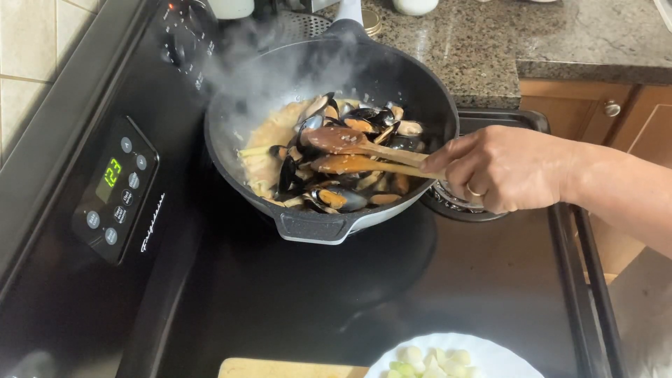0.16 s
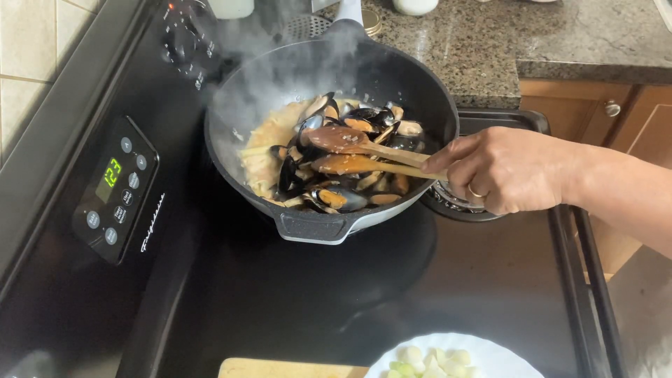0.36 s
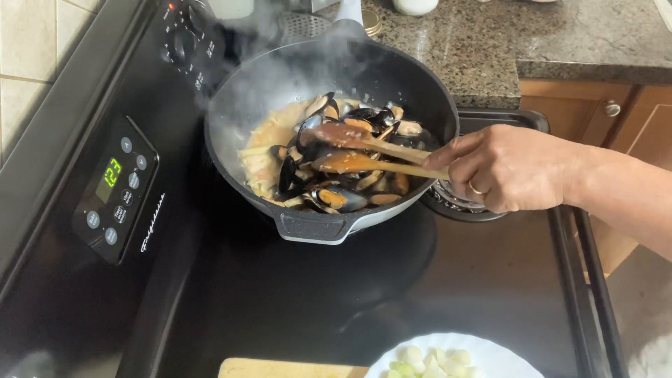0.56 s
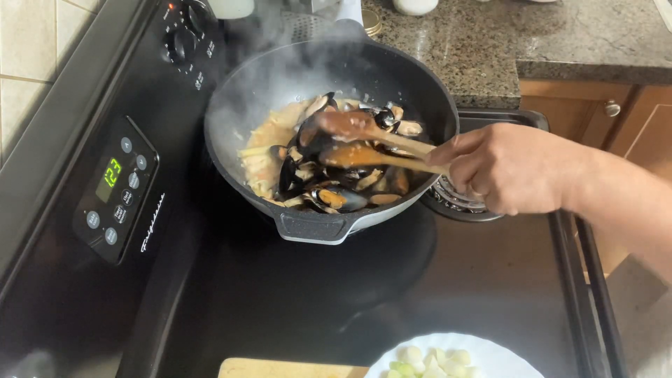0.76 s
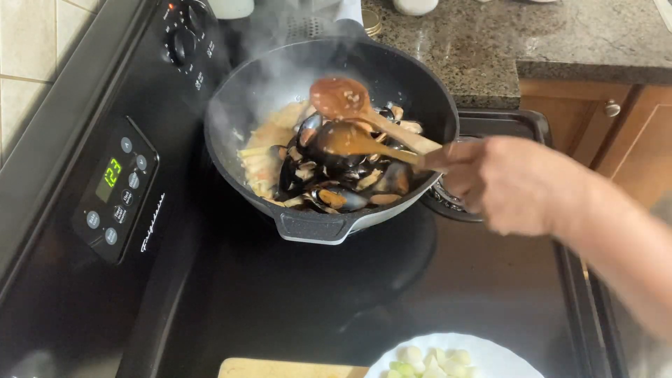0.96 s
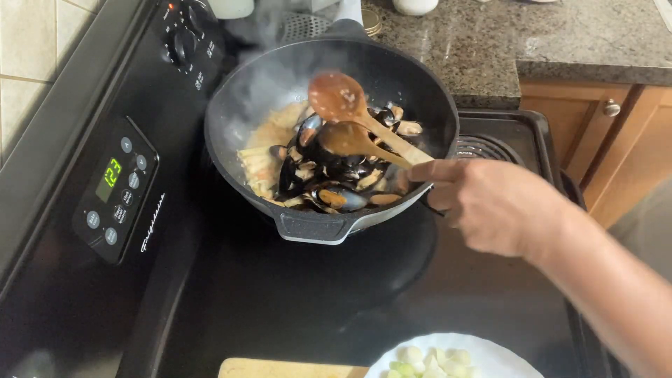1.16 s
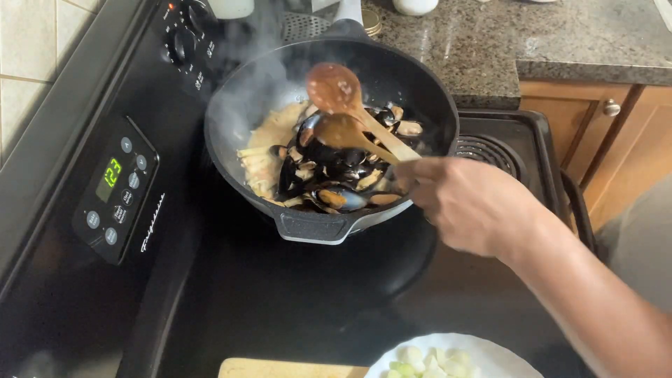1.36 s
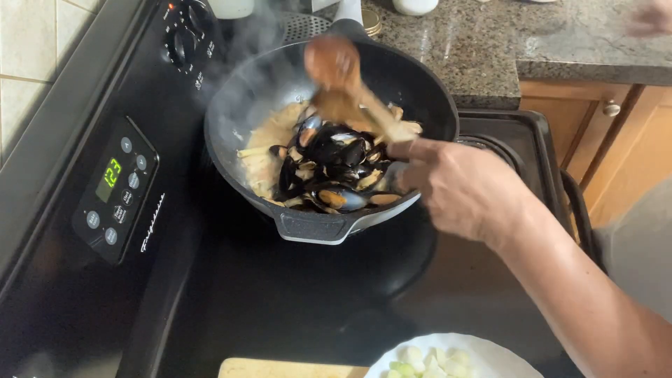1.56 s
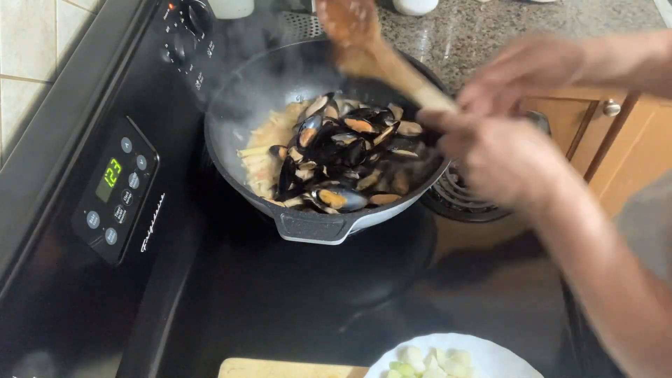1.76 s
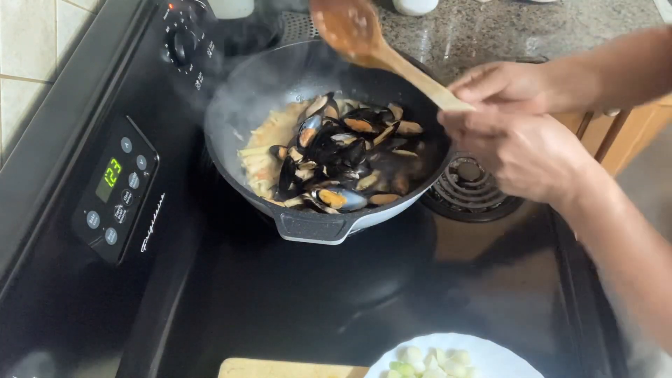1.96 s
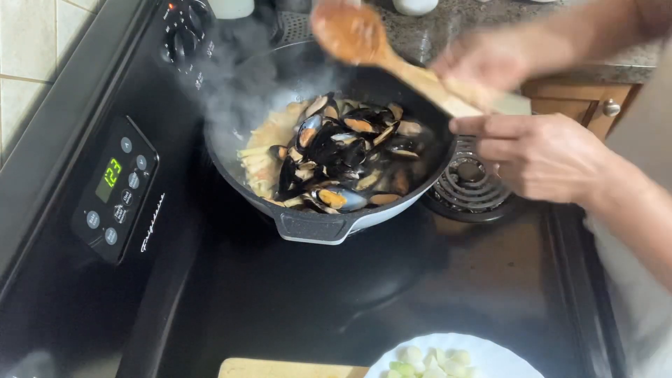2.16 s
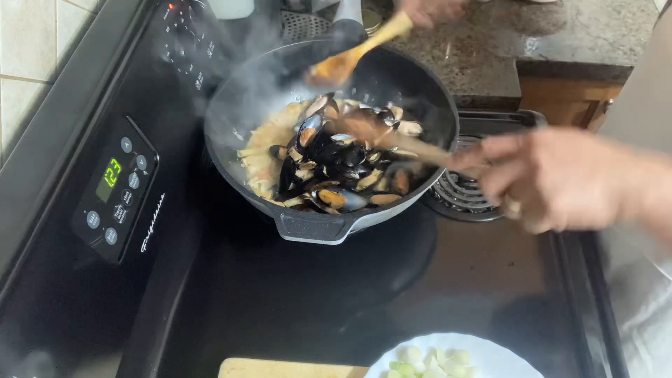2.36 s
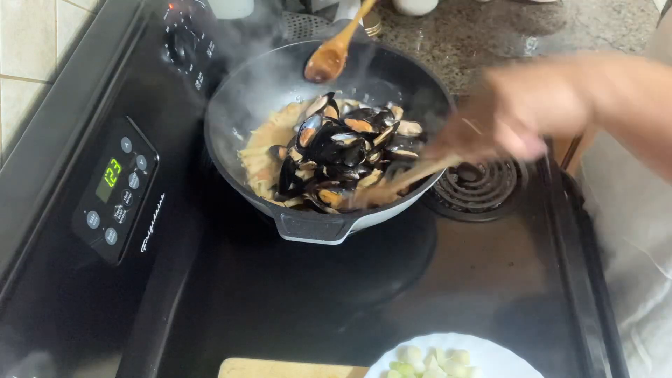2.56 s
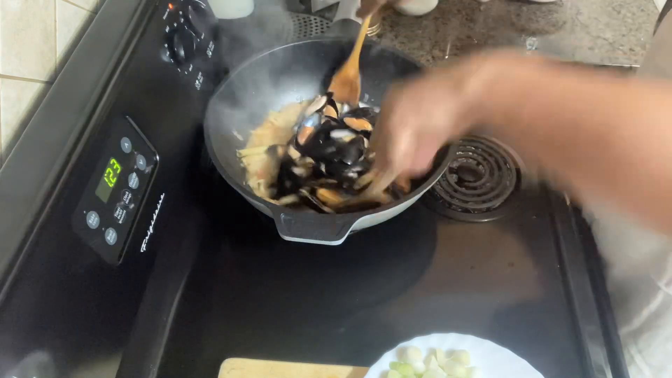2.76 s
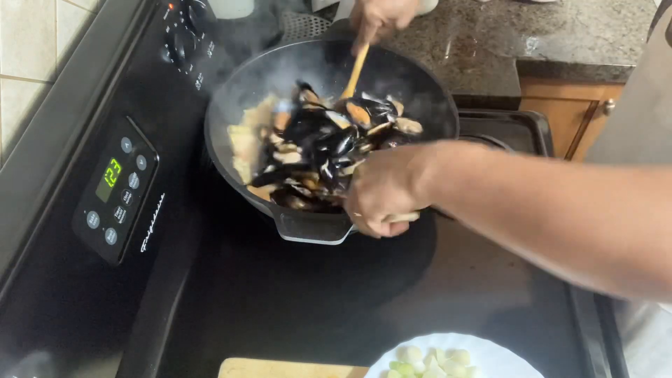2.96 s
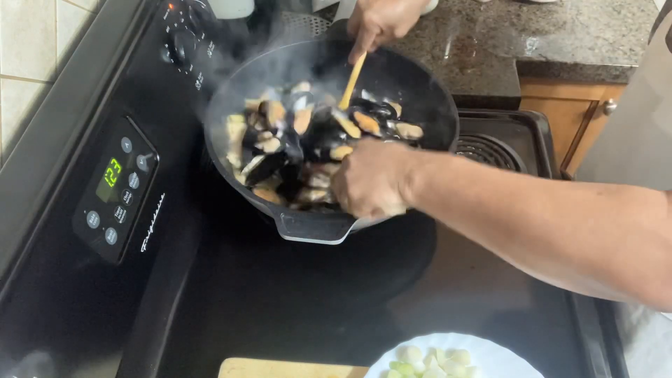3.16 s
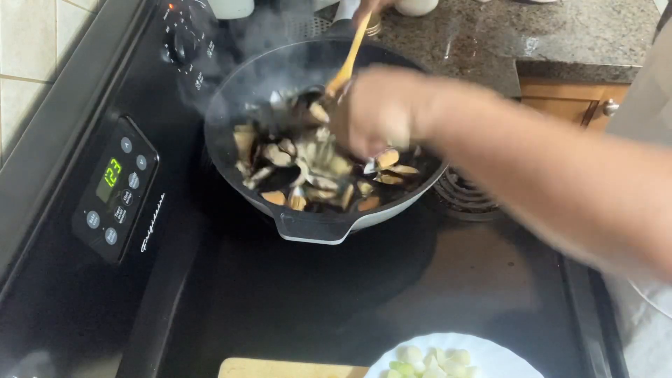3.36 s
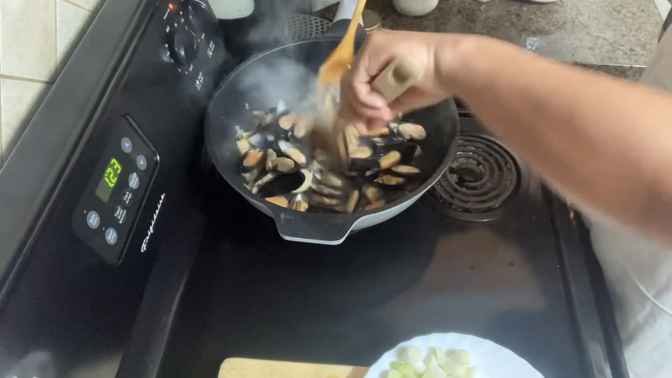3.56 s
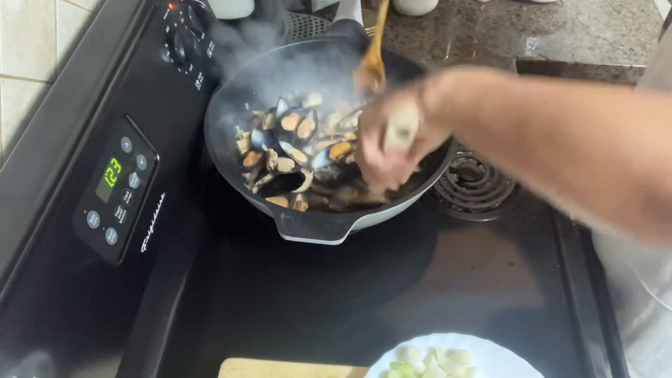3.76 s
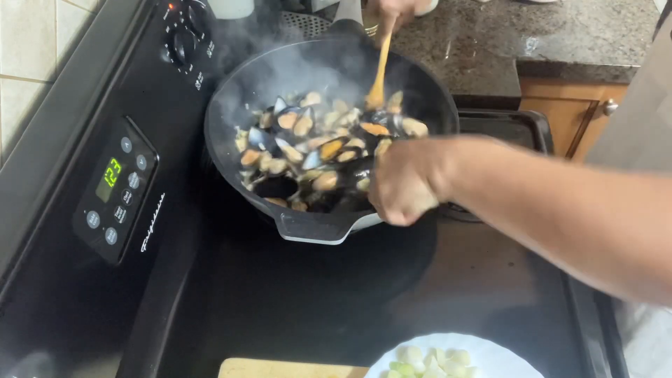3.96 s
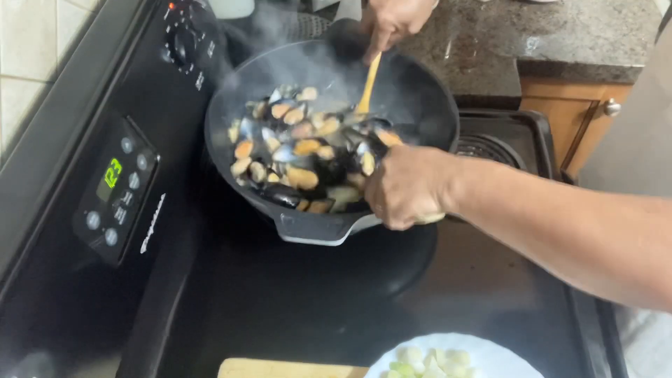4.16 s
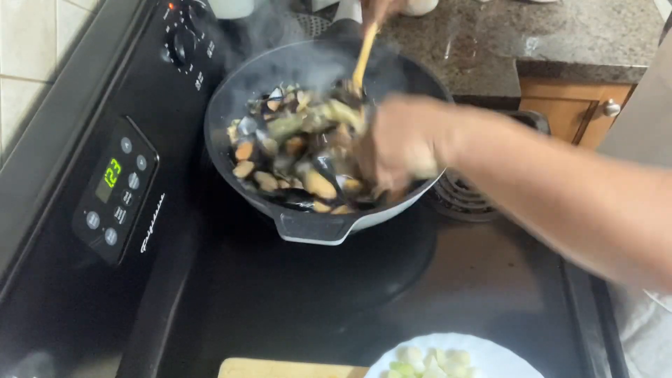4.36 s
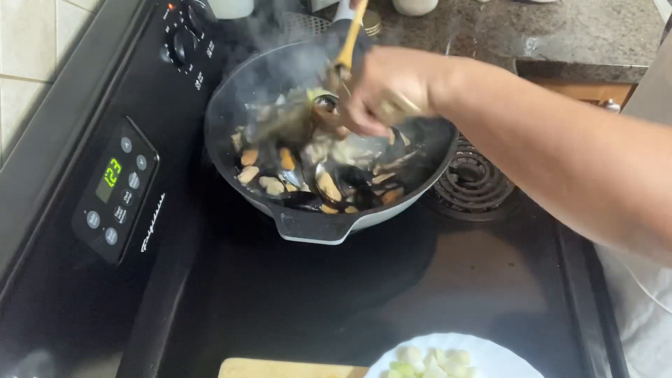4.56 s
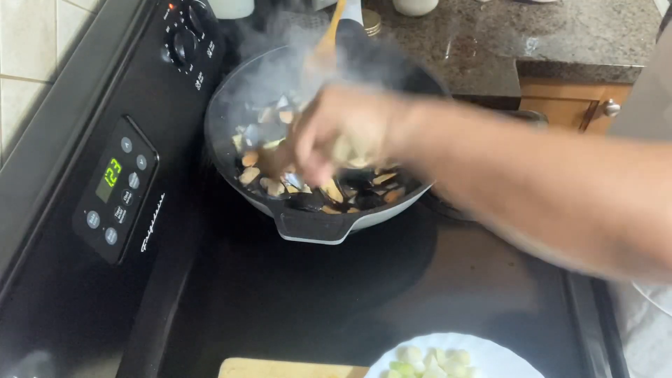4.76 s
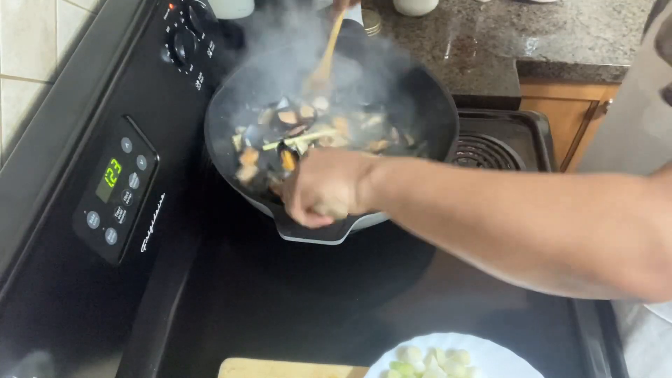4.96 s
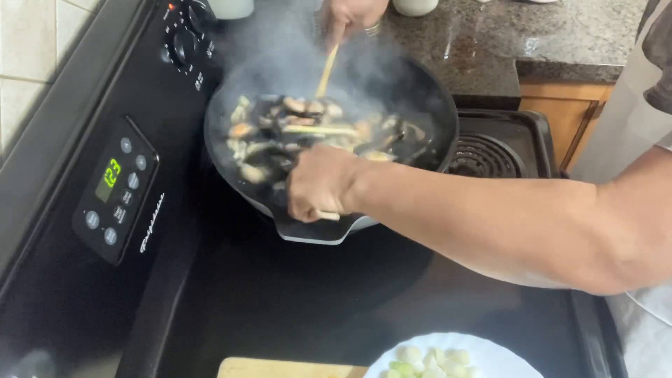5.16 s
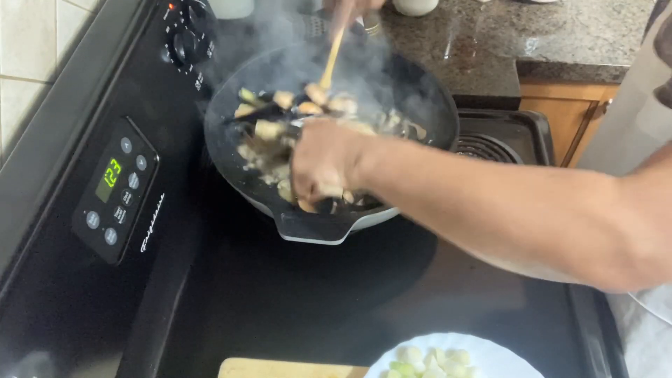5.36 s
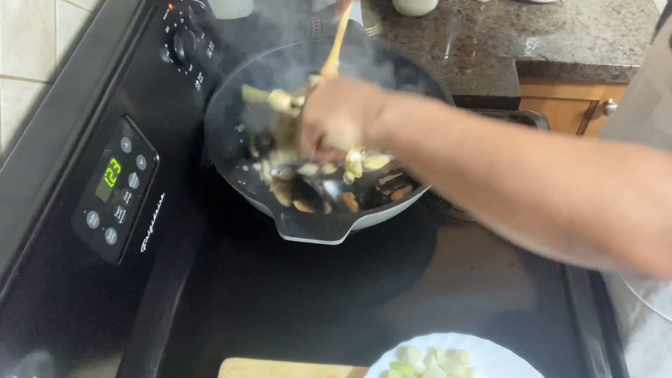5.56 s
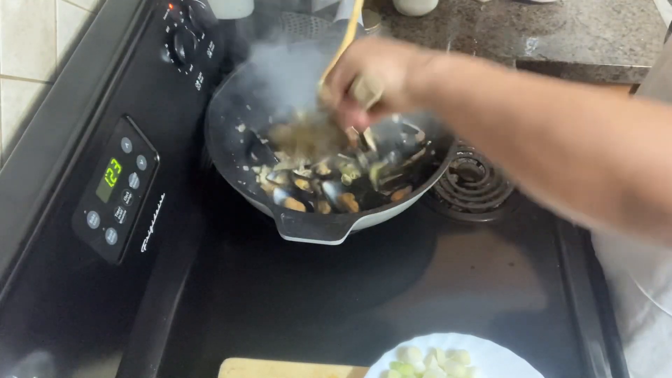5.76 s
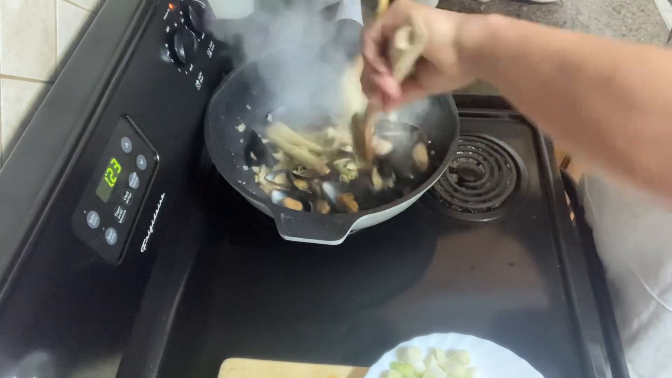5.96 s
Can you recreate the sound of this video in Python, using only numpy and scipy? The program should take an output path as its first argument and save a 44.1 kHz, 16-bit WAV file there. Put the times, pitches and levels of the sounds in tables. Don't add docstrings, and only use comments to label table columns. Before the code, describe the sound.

Close stereo pickup at a stove: steady airy steam and bubbling throughout. First, off to the side, a wooden cupboard door clicks, creaks briefly upward and slams. A calm stretch follows with faint shell ticks and bubble pops. Then spoons land on a ringing coated pan and turn a heap of hard shells three times, in dense irregular clatter with scraping, low pan shoves and sharp high snaps, loudest in the later two tosses.

```python
import sys
import numpy as np
from scipy import signal
from scipy.fft import rfft, irfft, next_fast_len
from scipy.io import wavfile
from scipy.ndimage import uniform_filter1d

SR = 44100
rng = np.random.default_rng(int(sys.argv[2]) if len(sys.argv) > 2 else 0)


def generate_wav(signal):
    frames = np.transpose(np.atleast_2d(signal))
    scaled = np.clip(frames, -1, 1) * 32767
    pcm = np.round(scaled).astype(np.int16)
    wavfile.write(sys.argv[1], SR, pcm)


def gain_from_decibels(decibels):
    exponent = np.asarray(decibels, float) / 20
    return 10 ** exponent


N = 265614

# start_s, snap of the lips snap_db, strongest ring ring_hz, body knock_db
FIRST_TOSS = [(2.55, -55, 854, -20), (2.652, -31, 4350, -29.5), (2.6796, -27, 2530, -38),
              (2.7546, -30, 2880, -31.5), (2.788, -46, 1100, -37), (2.8859, -26, 1190, -37),
              (2.921, -49, 1600, -34), (2.9568, -64, 1970, -31), (2.9987, -39, 1130, -34),
              (3.018, -31, 3050, -33), (3.041, -25.5, 1460, -28), (3.0953, -55, 1570, -32.5),
              (3.137, -18.5, 990, -26), (3.1795, -60, 1490, -35), (3.2058, -49, 1680, -37),
              (3.238, -55, 2070, -36), (3.2628, -30, 1940, -34.5), (3.308, -22.5, 4870, -34),
              (3.3658, -34, 3600, -43), (3.417, -33, 1576, -29), (3.4367, -47, 2290, -36),
              (3.456, -29, 3670, -49), (3.497, -28, 8650, -33), (3.5453, -26, 3010, -24),
              (3.5513, -12, 4100, -22.5), (3.5792, -32, 4040, -34), (3.5953, -21.5, 4450, -35)]
SECOND_TOSS = [(3.6554, -22, 3240, -19.5), (3.6629, -26, 1238, -19), (3.6788, -29, 2500, -16.5),
               (3.689, -50, 895, -28), (3.7215, -47, 2560, -24.5), (3.7269, -16, 950, -30),
               (3.815, -32, 1670, -30.5), (3.847, -39, 2400, -29), (3.8678, -51, 2260, -29),
               (3.9315, -32, 1690, -26), (3.957, -64, 1590, -31), (4.0712, -18, 7750, -26.5),
               (4.089, -61, 2700, -48), (4.198, -48, 1800, -32.5), (4.2437, -14, 1190, -31),
               (4.253, -4.5, 4770, -21.5), (4.2608, -26, 4930, -55), (4.3311, -21, 2700, -32),
               (4.3736, -22.5, 1360, -33), (4.3979, -17, 4870, -21.5), (4.4482, -2, 8720, -41),
               (4.4994, -28, 4930, -44), (4.5617, -41, 1990, -39), (4.619, -24, 3200, -37.5),
               (4.6585, -5.5, 8050, -23.5), (4.7274, -25.5, 2970, -29)]
THIRD_TOSS = [(4.787, -36.5, 2610, -19.5), (4.7988, -62, 850, -23.5), (4.8746, -27.5, 1825, -28.5),
              (4.8992, -30, 810, -32.5), (4.9346, -37, 1802, -21), (5.019, -22.5, 1180, -33),
              (5.0671, -32, 1970, -38), (5.1287, -32.5, 1450, -62), (5.187, -32, 1490, -51),
              (5.218, -8.5, 7740, -28), (5.298, -10, 7600, -31), (5.3145, -12.5, 8500, -28),
              (5.3584, -9, 4540, -25.5), (5.366, -39, 4500, -27), (5.4139, -25, 1600, -31),
              (5.4224, -5.5, 8450, -27.5), (5.4252, -33, 8000, -45), (5.5117, -22.5, 1700, -36),
              (5.547, -8.5, 4820, -28), (5.6836, -40, 1650, -36), (5.7091, -37, 3730, -36.5),
              (5.8037, -21.5, 8350, -41.5), (5.8987, -31.5, 1330, -35.5), (5.996, -28.5, 4600, -38.5)]
# start_s, level_db
STROKES = [
    (2.53, -44),
    (3.658, -41.5),
    (4.776, -42.5),
]


def at_hz(points, hz):
    point_hz, value = np.transpose(points)
    return np.interp(np.log(hz + 1), np.log(point_hz + 1), value)


def rms_one(x):
    return x / np.sqrt(np.mean(x ** 2) + 1e-20)


def coloured(spectrum, length):
    size = next_fast_len(length)
    hz = np.fft.rfftfreq(size, 1 / SR)
    noise = rfft(rng.standard_normal(size)) * gain_from_decibels(at_hz(spectrum, hz))
    return rms_one(irfft(noise, size))[:length]


def drift(rate_hz):
    steps = rng.standard_normal(int(N / SR * 60))
    width = max(int(30 / rate_hz), 1)
    smooth = uniform_filter1d(uniform_filter1d(steps, width), width)
    return np.interp(np.arange(N) / SR * 59, np.arange(len(steps)), rms_one(smooth))


def ring(x, hz, t60_s):
    r = gain_from_decibels(-60 / (t60_s * SR))
    w = 2 * np.pi * hz / SR
    return signal.lfilter([0, np.sin(w)], [1, -2 * r * np.cos(w), r * r], x + 1e-18)


def resonance(x, hz, width_hz):
    return rms_one(ring(x, hz, np.log(1000) / np.pi / width_hz))


def add(out, start_s, sound):
    i = round(start_s * SR)
    out[i:i + len(sound)] += sound[:N - i]


def jolt(t, rise_s, hold_s, t60_s):
    swell = np.minimum(t / rise_s, 1) ** 2
    return swell * gain_from_decibels(-60 * np.maximum(t - rise_s - hold_s, 0) / t60_s)


def grains(per_s, low_hz, high_hz, cycles, spread_db):
    born = np.flatnonzero(rng.random(N) < per_s * gain_from_decibels(4 * drift(12)) / SR)
    size_luck, sign_luck, place_luck = rng.random((3, len(born)))
    sizes = gain_from_decibels(-spread_db * np.log(np.maximum(size_luck, .01))) * np.sign(sign_luck - .5)
    out = np.zeros(N)
    for k, hz in enumerate(np.geomspace(low_hz, high_hz, 10)):
        mine = (place_luck * 10).astype(int) == k
        hits = np.bincount(born[mine], sizes[mine], N)
        out += gain_from_decibels(6.2 * drift(7)) * ring(hits, hz, cycles / hz)
    return rms_one(out)


def clacks():
    # low_hz, high_hz, cycles to die away, level_db
    shell_bands = [(660, 2140, 11.2, -4), (1820, 3750, 14.3, -1.5), (3670, 6790, 39, -4),
                   (6200, 16460, 38, -9.5)]
    snap_share = [.02, .12, .55, 1]
    # start_s, snap_db, ring_hz, knock_db
    settling = [
        (0.9268, -59, 832, -38),
        (1.017, -56, 1170, -43),
        (1.1367, -39.5, 1190, -43),
        (1.4444, -47, 950, -59),
    ]
    # start_s, snap_db, ring_hz, knock_db
    lip_tick = [
        (3.4975, -12, 11900, -54),
    ]
    # start_s, snap_db, ring_hz, knock_db
    stray = [(2.8156, -46, 2830, -47), (2.84, -34, 1720, -35.5), (3.048, -34, 3900, -46),
             (3.141, -24, 4870, -38), (3.2673, -38, 1930, -34.5), (3.395, -49, 1550, -39),
             (4.779, -41, 910, -30), (4.7925, -45, 2160, -23), (4.883, -43, 2900, -29.5),
             (4.912, -35, 2370, -32.5), (4.944, -36, 2600, -38), (5.0475, -51, 1970, -37.5),
             (5.0693, -50, 1900, -34), (5.0996, -53, 1590, -35), (5.1989, -27.5, 4500, -51),
             (5.428, -19, 6100, -41), (5.55, -27, 6250, -32)]
    tossed = FIRST_TOSS + SECOND_TOSS + THIRD_TOSS + stray
    out, crack = np.zeros(N), np.zeros(N)
    t = np.arange(900) / SR
    slots = np.arange(12)[:, None]
    for start_s, snap_db, ring_hz, knock_db in settling + lip_tick + tossed:
        chance = rng.random((4, 3, 12, 1))
        for (low, high, cycles, trim_db), share, (pitch, late, size) in zip(shell_bands, snap_share, chance):
            dull_db = 0.5 * max(np.log2(low / ring_hz), 0)
            band_db = share * snap_db + (1 - share) * (knock_db + 1 - dull_db)
            modes = low * (high / low) ** ((slots + pitch) / 12)
            since = np.maximum(t + .0025 * np.log(1 - .97 * late) * (slots % 2), 0)
            swell = np.minimum(since * modes / 0.55, 1)
            fade = gain_from_decibels(-8 * size - 60 * since * modes / cycles)
            body = (fade * swell * np.sin(2 * np.pi * modes * since)).sum(axis=0)
            body = body / np.sqrt(np.mean(body[:350] ** 2))
            if low <= ring_hz < high:
                fade = gain_from_decibels(-60 * t * ring_hz / (0.8 * cycles + 30)) * np.minimum(t / 0.00045, 1)
                body = body + 2.95 * fade * np.sin(2 * np.pi * ring_hz * t)
                band_db = band_db + 2.5 * (share < 1)
            add(out, start_s, gain_from_decibels(band_db + trim_db) * body)
    for start_s, snap_db, *_ in tossed:
        add(crack, start_s, rng.standard_normal(len(t)) * gain_from_decibels(snap_db - 11.5 - 60 * t / 0.0072))
    out += signal.sosfilt(signal.butter(2, 3800, "high", fs=SR, output="sos"), crack + 1e-18)
    return signal.sosfilt(signal.butter(3, 650, "high", fs=SR, output="sos"), out)


def near_rings():
    # start_s, pitch_hz, peak_db, t60_s
    near = [(3.4968, 11970, -3, 0.0075), (3.4973, 8400, -14, .005), (3.14, 4880, -17, .02),
            (3.2675, 1940, -16, .02), (3.418, 1600, -26, 0.028), (3.66, 868, -12, 0.22),
            (3.662, 1238, -14.5, .06), (3.684, 3790, -10, 0.052), (3.932, 1690, -29, .04),
            (4.257, 4330, -4, 0.016), (4.4494, 7360, -7, 0.013), (4.661, 8300, -4, .012),
            (4.79, 2170, -21, 0.15), (4.792, 3080, -23, .08), (4.875, 1820, -14, .03),
            (4.937, 1710, -24, .02), (5.0692, 1950, -9, 0.011), (5.219, 5200, -11.5, .02),
            (5.359, 1485, -12, 0.045), (5.4228, 7720, -6, .01), (5.4265, 6200, -2, 0.0073),
            (5.548, 6140, -9, .01)]
    # start_s, pitch_hz, peak_db, t60_s
    wall = [(2.535, 1220, -32, .15), (2.55, 2180, -24.5, 0.091), (2.552, 2837, -23, .05),
            (3.662, 2176, -17, 0.13), (3.69, 1960, -24, .12), (3.721, 2568, -34, 0.074),
            (4.79, 866, -25.5, 0.27), (4.789, 1238, -36, .2), (4.79, 1620, -30, .14),
            (4.788, 2670, -25, .06), (4.79, 3170, -22, .1)]
    # start_s, pitch_hz, peak_db, t60_s
    bumps = [
        (.29, 64.6, -23, 0.32),
        (4.112, 58, -26, 0.39),
        (4.131, 136, -22, 0.11),
        (5.029, 63.6, -38, 0.69),
    ]
    out, t = np.zeros(N), np.arange(SR // 2) / SR
    for start_s, hz, db, t60_s in near + wall + bumps:
        swell = np.minimum(np.maximum(t * hz / 2, t / 0.0074), 1)
        add(out, start_s, gain_from_decibels(db - 60 * t / t60_s) * swell * np.sin(2 * np.pi * hz * t))
    return out


def edge_ticks():
    # start_s, peak_db
    ticks = [(3.143, -12), (3.3065, -30), (3.3136, -17), (3.3179, -17), (3.4967, -15), (3.5524, -11),
             (3.56, -19), (3.5672, -22), (3.5968, -23), (3.656, -11), (3.6802, -22), (3.6814, -22),
             (3.6911, -27), (3.6942, -21), (3.7003, -24), (3.7287, -20), (4.072, -17), (4.2476, -11),
             (4.2489, -17), (4.2628, -11), (4.302, -19), (4.3044, -22), (4.3404, -23), (4.347, -25),
             (4.398, -10), (4.449, -5.5), (4.4752, -22), (4.6587, -23), (4.6677, -16), (4.7891, -15),
             (5.02, -19), (5.298, -23), (5.307, -24), (5.3634, -19), (5.3691, -16), (5.409, -19),
             (5.4198, -23), (5.4227, -15), (5.4269, -6), (5.428, -9), (5.4415, -19), (5.451, -20),
             (5.5485, -8), (5.5498, -5.5)]
    # pitch_hz, level_db, t60_s
    tick_rings = [(5200, 4, 0.0022), (8300, -5, 0.0027), (12500, -38, 0.0014)]
    out, t = np.zeros(N), np.arange(300) / SR
    tick = sum(gain_from_decibels(db - 60 * t / t60_s) * np.sin(2 * np.pi * hz * t) for hz, db, t60_s in tick_rings)
    for start_s, db in ticks:
        add(out, start_s, gain_from_decibels(db) * tick)
    return out


def sliding():
    # time_s, level_db
    slide = [(2.5, -50), (2.59, -49), (2.74, -37.5), (2.86, -47), (3.37, -41), (3.55, -30), (3.67, -58),
             (3.72, -29), (4.03, -51), (4.72, -40), (4.84, -45), (5.03, -46), (5.25, -41), (5.43, -34),
             (5.76, -71), (6.02, -38.5)]
    # pitch_hz, level_db per Hz
    slide_colour = [(500, -33), (1100, -12), (1800, 6), (3000, -26), (4500, 0.5), (6300, -10), (9000, -25)]
    s, db = np.transpose(slide)
    level_db = np.interp(np.arange(N) / SR, s, db, left=-99) - 7.5 + 0.5 * drift(25)
    wash = coloured(slide_colour, N)
    return gain_from_decibels(level_db) * (1.15 * wash + 1.3 * grains(350, 940, 5380, 25.0, 3.2))


def stirring():
    # time_s, level_db
    tumble = [(2.5, -68), (2.6, -68), (2.73, -43), (2.8, -38.5), (3.52, -46.5), (3.71, -36.5), (4.01, -37),
              (4.21, -54), (4.35, -94), (4.69, -34), (4.84, -55), (5.02, -47.5), (5.25, -58), (5.43, -70),
              (5.77, -59), (6.02, -70)]
    s, db = np.transpose(tumble)
    tumble_db = np.interp(np.arange(N) / SR, s, db, left=-99)
    scrape, after = gain_from_decibels(tumble_db - 12), np.zeros(N)
    t = np.arange(SR) / SR
    for start_s, db in STROKES:
        add(scrape, start_s, gain_from_decibels(db) * jolt(t, rise_s=0.23, hold_s=0.24, t60_s=0.83))
    for start_s, snap_db, *_ in FIRST_TOSS + SECOND_TOSS + THIRD_TOSS:
        add(after, start_s, gain_from_decibels(snap_db - 32) * jolt(t, rise_s=0.019, hold_s=0.0086, t60_s=0.2))
    rub = gain_from_decibels(tumble_db) + .5 * after
    rattle_db = -43.0 + 0.66 * (tumble_db + 45.5) - 10
    rattle = gain_from_decibels(rattle_db) * (tumble_db > -90) + after
    return (scrape * grains(1400, 900, 2320, 29, 1.4) + rub * grains(2500, 2030, 5870, 22, 5.4)
            + rattle * grains(3000, 8100, 11200, 14, 2.5))


def shove():
    push, t = np.zeros(N), np.arange(SR) / SR
    for start_s, db in STROKES:
        add(push, start_s, gain_from_decibels(db + 11.5) * jolt(t, rise_s=0.0092, hold_s=0.012, t60_s=1.24))
    colour = [(25, -34), (55, -9), (130, 14), (260, 4.5), (480, 3.0), (900, -53)]  # (Hz, dB per Hz)
    return push * coloured(colour, N) * gain_from_decibels(3.7 * drift(18))


def hollow():
    # time_s, pitch_hz, level_db
    hollows = [
        [(2.76, 1050, -46), (2.82, 1148, -29), (2.9, 1298, -34.5), (2.96, 1750, -39), (3.06, 1703, -33),
         (3.3, 1866, -47), (3.46, 1710, -37)],
        [(3.76, 1600, -52), (3.82, 1730, -32), (3.9, 1812, -35), (3.96, 1820, -26), (4.05, 1750, -48),
         (4.12, 1690, -54)],
        [(4.86, 1800, -53), (4.92, 1920, -37), (5.0, 1715, -41), (5.08, 1884, -29), (5.15, 1600, -50)],
    ]
    out, t = 0, np.arange(N) / SR
    low_pass = signal.butter(2, 480 / 2, fs=SR, output="sos")
    rub = signal.sosfilt(low_pass, rng.standard_normal((2, N)))
    for stroke in hollows:
        s, hz, db = np.transpose(stroke)
        phase = 2 * np.pi * np.cumsum(np.interp(t, s, hz)) / SR
        out = out + gain_from_decibels(np.interp(t, s, db, left=-99, right=-99)) * np.sin(phase)
    return out * rms_one(rub) * gain_from_decibels([[1], [-1]])


def knocks():
    # start_s, peak_db, thud_db
    hits = [
        (2.531, -20, -17),
        (2.537, -27, -28),
        (3.137, -42, -33),
        (3.656, -46, -45),
        (3.679, -21.5, -41),
        (4.141, -47, -8),
        (4.788, -16, -29),
        (4.935, -33, -13),
        (5.359, -30, -27),
    ]
    # pitch_hz, level_db, t60_s
    pan = [(110, -14, 0.12), (206, -22, 0.27), (457, -16, 0.18), (790, -16, 0.03), (858.3, 7.5, 0.26),
           (1238, -7, 0.15), (1460, -42, 0.081), (1970, 5, 0.084), (2400, -32, .1), (2900, -20, 0.037),
           (3730, -12, 0.3)]
    at_s, db, thud_db = np.transpose(hits)
    out = np.zeros(N)
    for hz, mode_db, t60_s in pan:
        clicks = np.zeros(N)
        low_db = (hz < 450) * (thud_db + 6)
        clicks[(at_s * SR).astype(int)] = gain_from_decibels(db + mode_db - 11.5 + low_db + rng.normal(0, 5.7, len(at_s)))
        out += ring(clicks, hz, t60_s)
    return signal.lfilter([.4], [1, -.6], out)


def door():
    # start_s, level_db, rise_s, hold_s, t60_s
    jolts = [
        (0.013, -21, 0.0088, 0.0068, 0.2),
        (0.2253, -16.5, 0.002, 0.021, 0.29),
        (0.267, -62, 0.06, 0.18, 0.078),
        (0.493, -26.5, 0.03, 0.0044, 0.16),
        (0.534, -4, 0.0051, 0.0069, 0.38),
    ]
    # pitch_hz, level_db per Hz
    colours = [
        [(24, -72), (40, -46), (92, -14), (574, -16), (703, -16), (805, 0.5), (1320, -19), (2030, -9),
         (2780, -21), (8800, -22.5), (12500, -26), (19400, -120)],
        [(24, -41), (40, -19), (249, -57), (334, -13), (587, -2), (687, -24), (787, -9.5), (1210, -30),
         (2780, -22.5), (8800, -40), (12500, -44.5), (19400, -120)],
        [(24, -16), (58, 3), (84, -22), (124, -6.5), (166, -16.5), (249, 7), (382, -6), (437, -0.5),
         (901, -17.5), (1010, -23.5), (2660, -22), (8800, -29.5), (12500, -35.5), (19400, -120)],
    ]
    # pitch_hz, width_hz, latch_db, release_db, bang_db
    panel_tones = [(250, 4.5, -36, 5, -15), (344, 8, 2.5, -1, -6), (431, 8.4, -28, -14, -11),
                   (480, 17, -21, -9, -17), (580, 21, 8.5, 20, 9), (806, 36, 3.5, 7.5, -6),
                   (912, 85, -5, -32, -1.5), (1590, 53, 4.5, -31, -26), (2070, 95, 4, -33, -10),
                   (2526, 250, -27, -27, -4.5), (2830, 240, -10, -20, -6), (4710, 450, 3.5, -3.5, -3)]
    # start_s, level_db, pitch_hz, width_hz, rise_s, hold_s, t60_s
    loose = (0.615, -33, 2700, 900, 0.012, 0.05, 0.1)
    rattle, panel = np.zeros(N), np.zeros(N)
    t = np.arange(SR // 2) / SR
    for kind, (start_s, db, *shape) in zip([0, 1, 0, 0, 2], jolts):
        white = rng.standard_normal(len(t))
        colour = colours[kind][:-1]
        colour = colour + [(27000, colour[-1][1] - 9)]
        modes = 0
        for hz, width_hz, *levels_db in panel_tones:
            tone = np.exp(-0.06 * width_hz * t) * np.sin(2 * np.pi * hz * t)
            modes = modes + gain_from_decibels(levels_db[kind]) * (.5 * resonance(white, hz, width_hz) + 0.89 * tone)
        push = jolt(t, *shape)
        add(rattle, start_s, gain_from_decibels(db) * push * coloured(colour, len(t)))
        add(panel, start_s, gain_from_decibels(db - 11.5) * push * modes)
    start_s, db, hz, width_hz, *shape = loose
    ware = resonance(resonance(white, hz, width_hz), hz, width_hz)
    add(rattle, start_s, gain_from_decibels(db) * jolt(t, *shape) * ware)
    return rattle, panel


def hinge():
    # time_s, pitch_hz, level_db
    squeak = [
        [(0.33, 511.7, -24), (0.388, 516, -27), (0.43, 573, -18.5), (0.476, 600, -15.5), (0.53, 633, -31)],
        [(0.3, 808, -27), (0.344, 713, -18.5), (0.446, 792, -23), (0.53, 894, -11.5)],
        [(.27, 1090, -12), (.33, 1052, -23.5), (.39, 1114, -23), (.44, 1144, -28), (.49, 1174, -35)],
        [(.265, 1432, -8), (.31, 1460, -20.5), (.4, 1460, -25.5), (.45, 1520, -27.5), (.53, 1610, -19)],
        [(0.26, 2320, -7), (0.305, 2230, -22), (0.35, 2240, -27), (0.44, 2220, -36)],
        [(.4, 1400, -32), (.45, 1423, -27), (.53, 1530, -36)],
    ]
    out, t = np.zeros(N), np.arange(SR) / SR
    for partial in squeak:
        s, hz, db = np.transpose(partial)
        waver = 1 + 0.0079 * drift(30)[:SR]
        phase = 2 * np.pi * np.cumsum(np.interp(t, s, hz) * waver) / SR
        fade = np.clip(np.minimum(t - s[0], s[-1] - t) / 0.042, 0, 1)
        stutter = 0.95 + 0.32 * resonance(rng.standard_normal(SR), 29, 61)
        add(out, 0, fade * gain_from_decibels(np.interp(t, s, db) - 10.5) * stutter * np.sin(phase))
    return out


def crockery():
    # start_s, pitch_hz, level_db, t60_s
    pings = [
        (.695, 3680, -35, .6),
        (.72, 2940, -45, .3),
        (.925, 2950, -46, .25),
        (.035, 2050, -37, .3),
    ]
    out, t = np.zeros(N), np.arange(SR // 5) / SR
    fade = np.clip(np.minimum(t / .008, (.115 - t) / .02), 0, 1)
    for start_s, hz, db, t60_s in pings:
        add(out, start_s, gain_from_decibels(db - 60 * t / t60_s) * fade * np.sin(2 * np.pi * hz * t))
    return out


def bubble_pops():
    # start_s, peak_db, pitch_hz
    pops = [(0.879, -37, 1200), (1.018, -36, 1200), (1.136, -36, 1220), (1.296, -38, 1240),
            (1.442, -34, 1400), (1.552, -32, 860), (1.723, -35, 840), (2.046, -36, 880), (2.1, -29.5, 1130),
            (2.341, -32, 1210)]
    out, t = np.zeros(N), np.arange(SR // 2) / SR
    t60_s = 0.05
    for start_s, db, hz in pops:
        fade = gain_from_decibels(db + 1.0 - 60 * t / t60_s) * np.minimum(t / .003, 1)
        add(out, start_s, fade * np.sin(2 * np.pi * hz * t * (1 + .06 * t / t60_s)))
    return out


def simmer():
    # pitch_hz, level_db per Hz
    steam = [(15, -61), (25, -36), (58, -9.5), (206, -15), (242, 1.5), (335, -16.5), (394, -3), (489, -5),
             (1160, -10.5), (1480, -15.5), (1650, -8), (5280, -22.5), (6210, -25), (7920, -25.5),
             (16000, -34.5)]
    # pitch_hz, width_hz, level_db
    air_tones = [(257, 77, -44), (410, 16.6, -51.5), (859, 17, -52.5), (1265, 300, -43.5),
                 (1600, 55, -53.5)]
    air = gain_from_decibels(-45 + 3.5 + 0.22 * drift(0.38)) * coloured(steam, N)
    air = air * gain_from_decibels(1.5 * drift(14))
    white = rng.standard_normal(N)
    hood = sum(gain_from_decibels(db + 0.5 * drift(5.3)) * resonance(white, hz, width_hz) for hz, width_hz, db in air_tones)
    return air + hood + gain_from_decibels(-44.5) * grains(450, 844, 2930, 16.0, 2.9)


def kitchen(x, scatter, near_db, walls_db):
    # pitch_hz, t60_s
    room_t60 = [(100, 0.14), (1000, 0.23), (4000, 0.52), (12000, 0.099)]
    t = np.arange(SR // 3) / SR
    walls = 0
    for low in 62.5 * 2 ** np.arange(8):
        band = signal.butter(2, [low, min(2 * low, .45 * SR)], "band", fs=SR, output="sos")
        noise = signal.sosfilt(band, rng.standard_normal((2, len(t))))
        walls = walls + noise * gain_from_decibels(-60 * t / at_hz(room_t60, 1.56 * low))
    walls = walls * np.minimum(t / 0.005, 1) * (1 + gain_from_decibels(near_db - 60 * t / 0.066))
    echo = gain_from_decibels(walls_db) * walls / np.sqrt(np.sum(walls ** 2) / 2)
    for side, lags in enumerate([(5, 37), (11, 23)]):
        near = 1. * (np.arange(2048) == 0)
        for lag in lags:
            taps = np.r_[1, np.zeros(lag - 1), scatter]
            near = signal.lfilter(taps[::-1], taps, near)
        echo[side, :2048] += near
    return signal.oaconvolve(x[None], echo, axes=1)[:, :N]


def ports(x, shared):
    # pitch_hz, level_db
    microphone = [(20, -43), (38, -19), (55, -11), (13500, -2.5), (15000, -12), (16700, -23), (17000, -60)]
    # pitch_hz, share (-1 to 1)
    treble_common = [(7600, .96), (16000, .97)]
    treble_lag_s, bass_lead_s = 11.15 / SR, 4.5 / SR
    size = next_fast_len(x.shape[1] + 64)
    hz = np.fft.rfftfreq(size, 1 / SR)
    left, right = rfft(x, size) * gain_from_decibels(at_hz(microphone, hz))
    common = np.clip(at_hz(shared + treble_common, hz), -1, 1)
    treble = hz > 1600
    turn = np.where(treble, 2 * np.pi * hz * treble_lag_s - .5, -2 * np.pi * hz * bass_lead_s)
    same = common * left * np.exp(1j * turn) * gain_from_decibels(-1.2 * ~treble)
    right = same + np.sqrt(1 - common ** 2) * right
    return irfft(np.array([left, right]), size)[:, :x.shape[1]]


def scene():
    # pitch_hz, share (-1 to 1)
    wok_common = [(60, 0.9), (95, 0.94), (140, 1), (300, 0.63), (600, 0.95), (1200, 0.2), (2300, 0.093),
                  (5500, 0.1)]
    # pitch_hz, share (-1 to 1)
    door_common = [(60, 0.82), (110, 0.81), (180, 0.084), (300, .1), (600, 0.75), (1300, 0.14),
                   (2300, 0.08), (5500, .1)]
    shells, pan = clacks(), knocks()
    in_room = shells + sliding() + stirring() + shove() + pan
    wok = gain_from_decibels(-15.0) * shells + kitchen(in_room, scatter=0.52, near_db=10.0, walls_db=-1) + pan

    end = 2 * SR
    rattle, panel = door()
    tones, rattle = (hinge() + panel)[:end], rattle[:end]
    room = kitchen(rattle + gain_from_decibels(-5.0) * tones, scatter=0.48, near_db=9.0, walls_db=2.0)[:, :end]
    direct = (tones + gain_from_decibels(-34.0) * rattle) * gain_from_decibels([[.8], [-2.5]])
    notch = signal.iirnotch(335, 14.5, fs=SR)
    cupboard = signal.lfilter(*notch, room + direct)

    air = np.array([simmer(), simmer()]) * gain_from_decibels([[1.1], [-1.1]])
    close = near_rings() + edge_ticks() + bubble_pops() + hollow()
    out = ports(wok * gain_from_decibels([[.8], [-.8]]) + crockery() + air + close, wok_common)
    out[:, :end] += ports(cupboard, door_common)
    return out


def roll_off(x):
    return signal.sosfilt(signal.butter(12, 16970, fs=SR, output="sos"), x)


def record(dry):
    mix = np.tanh(dry / 1.1) * 1.1
    return roll_off(mix)


dry = scene()
out = record(dry)
generate_wav(out)
```